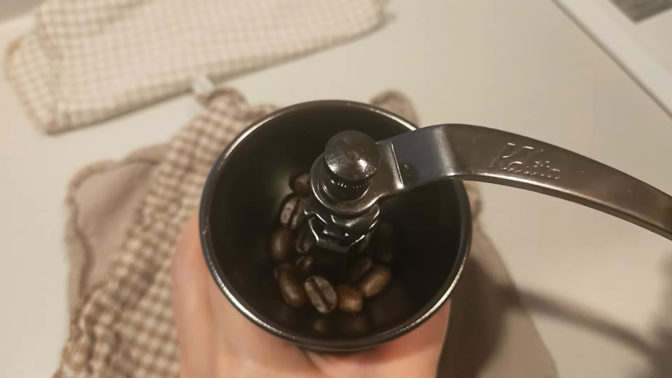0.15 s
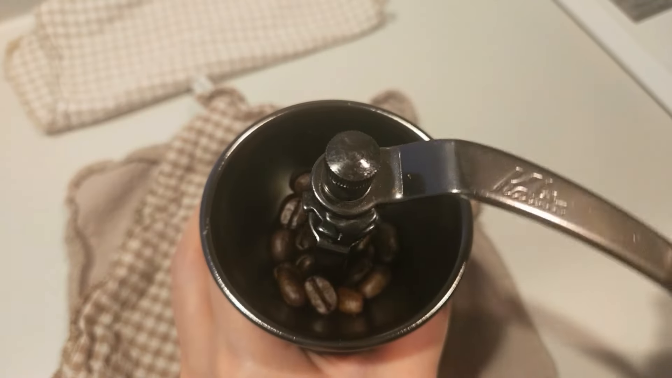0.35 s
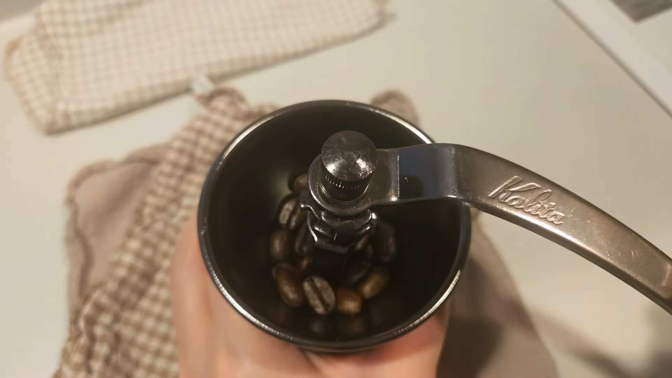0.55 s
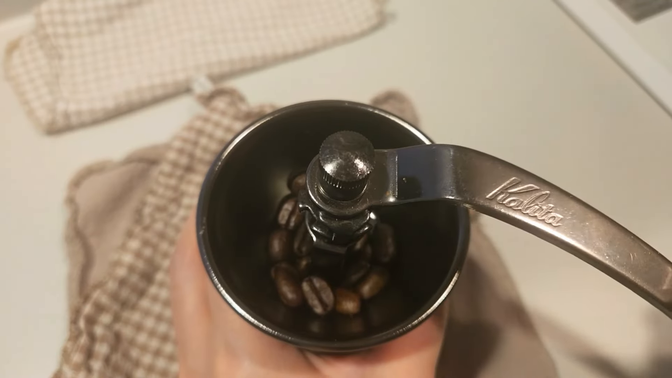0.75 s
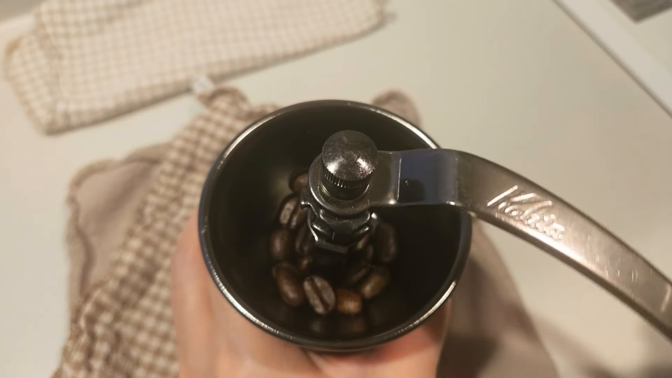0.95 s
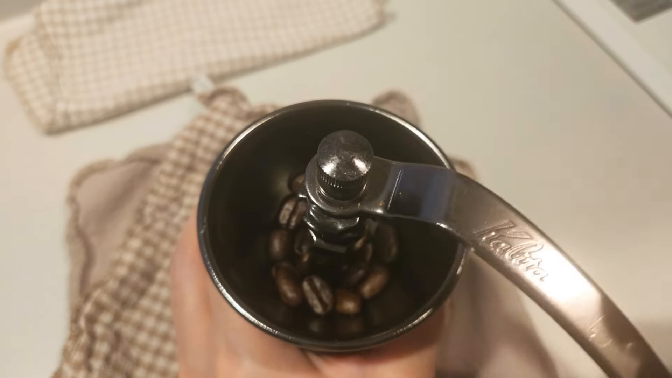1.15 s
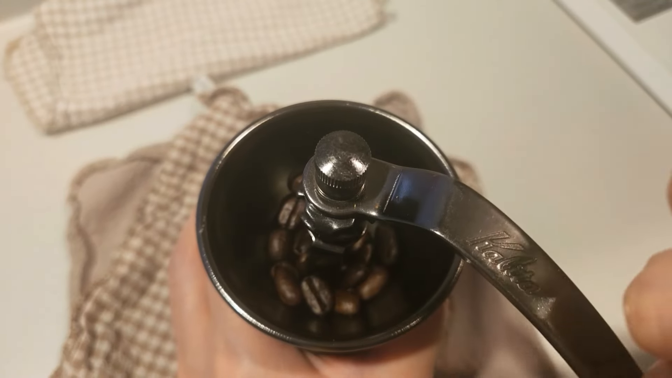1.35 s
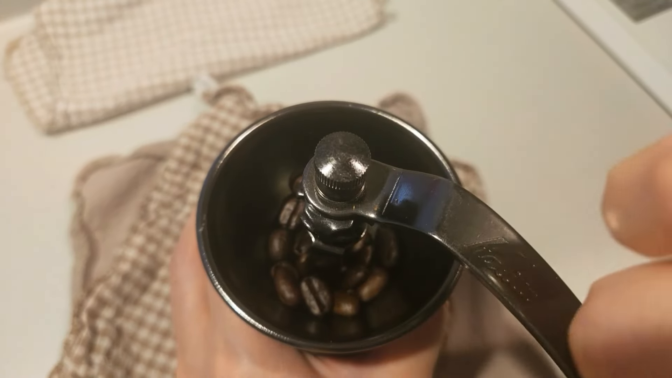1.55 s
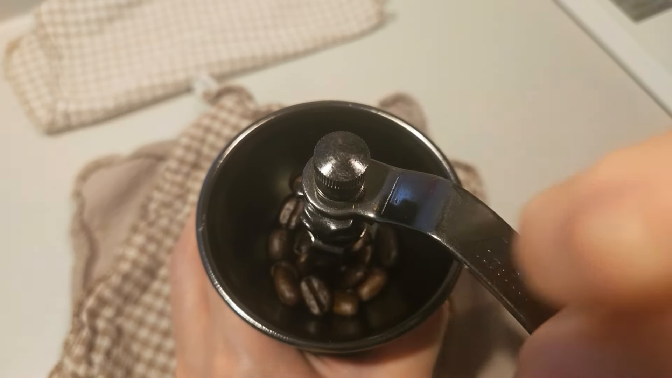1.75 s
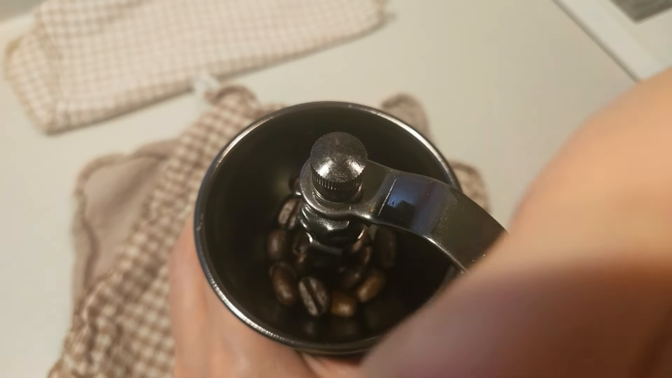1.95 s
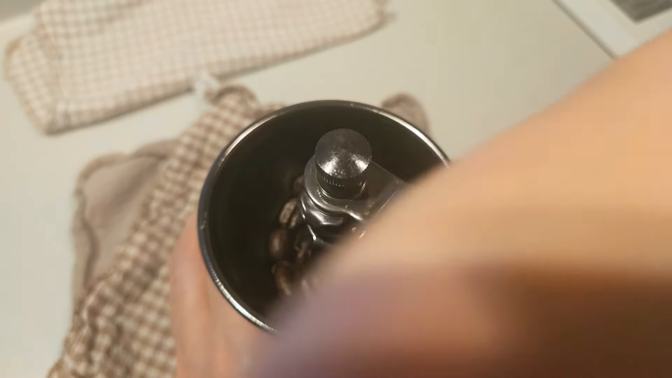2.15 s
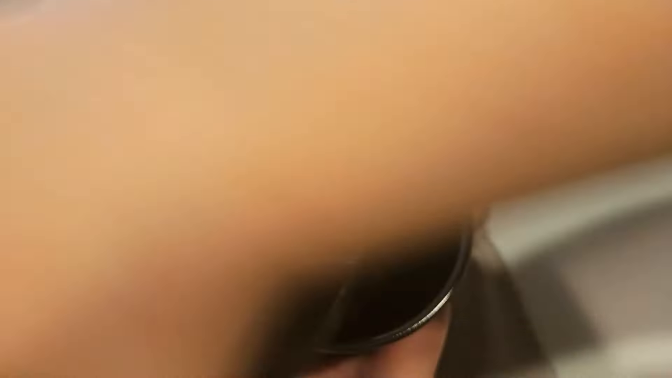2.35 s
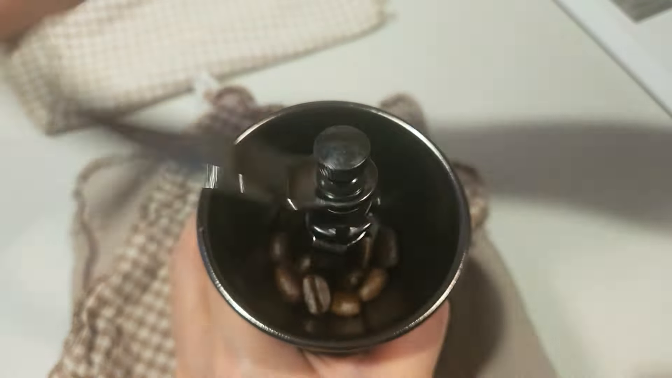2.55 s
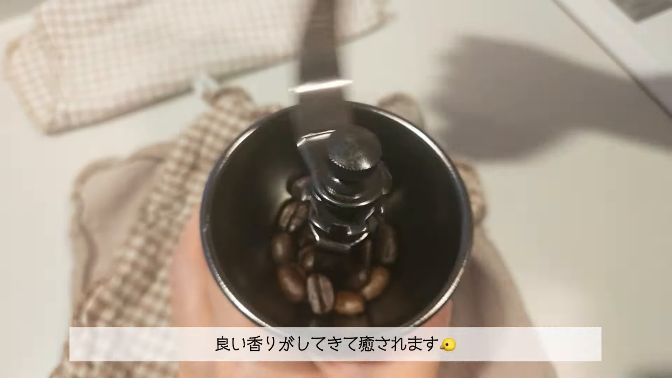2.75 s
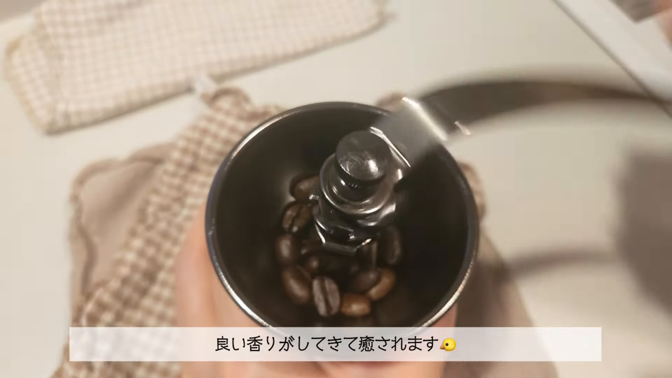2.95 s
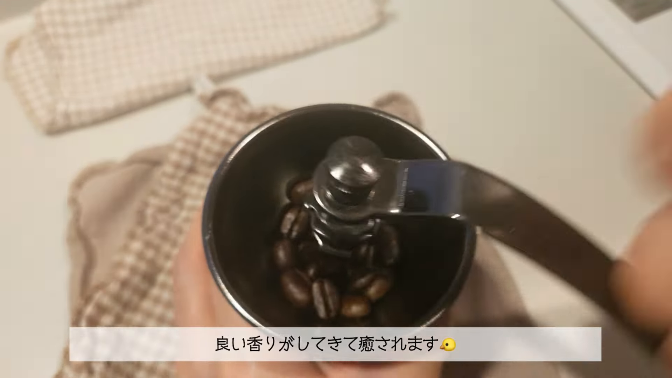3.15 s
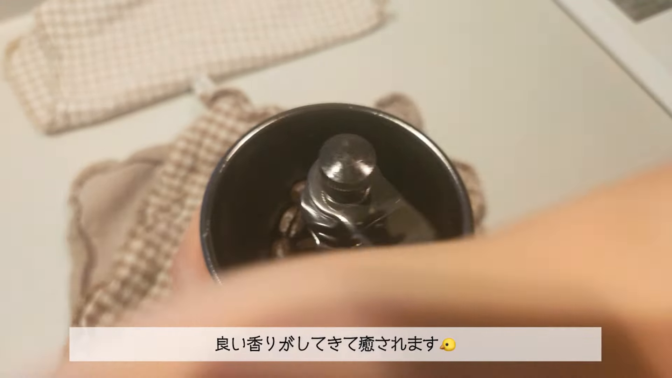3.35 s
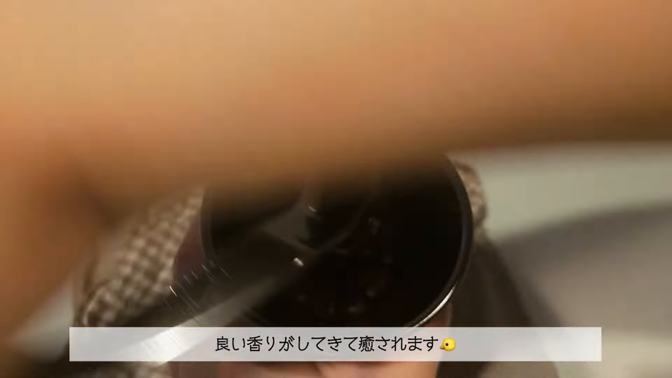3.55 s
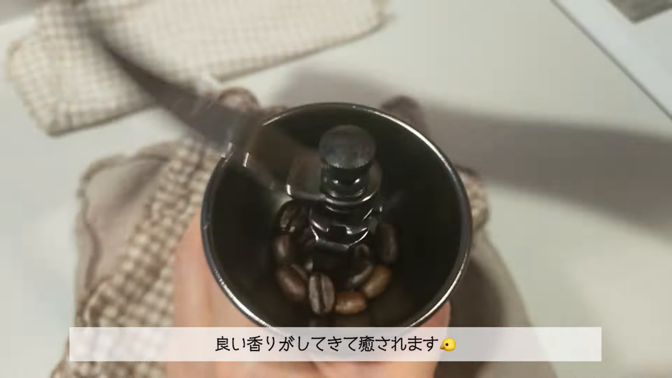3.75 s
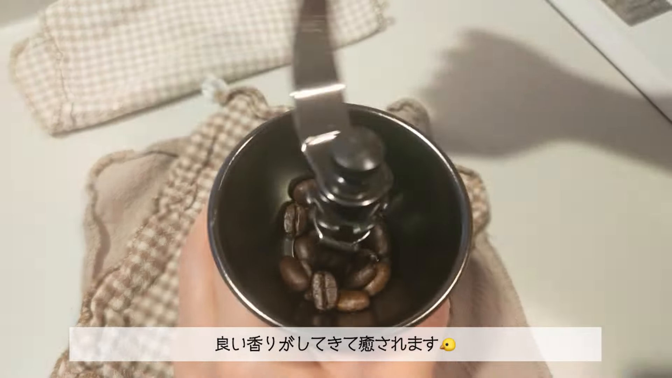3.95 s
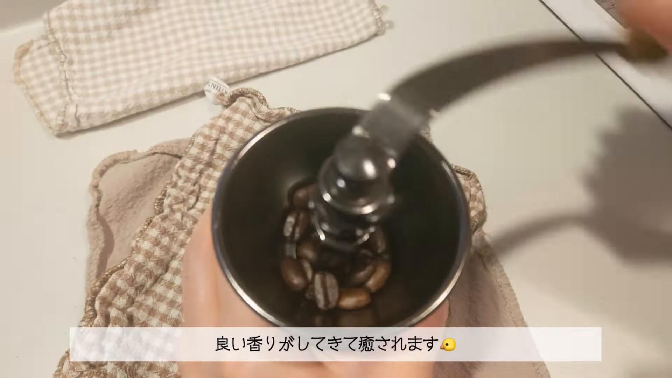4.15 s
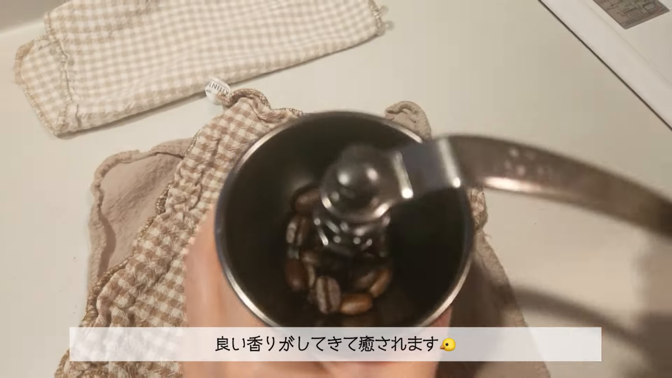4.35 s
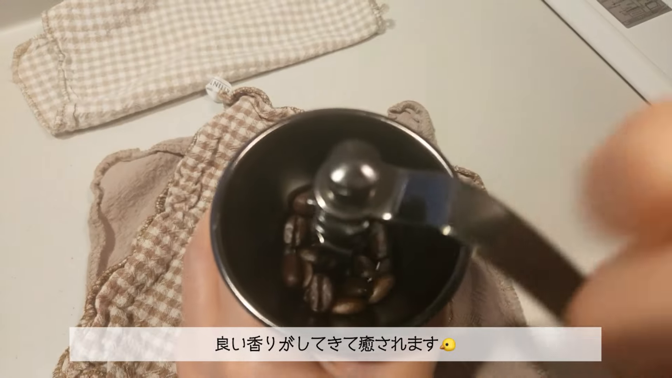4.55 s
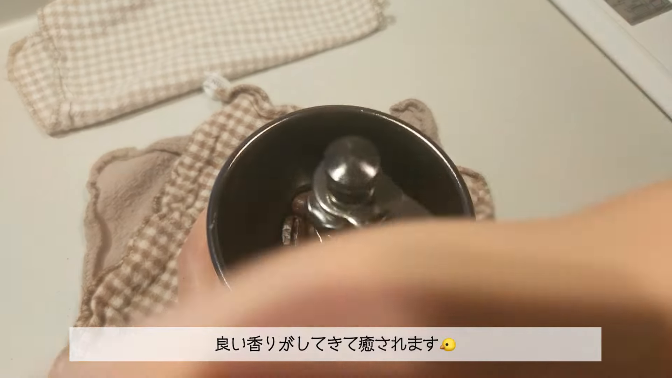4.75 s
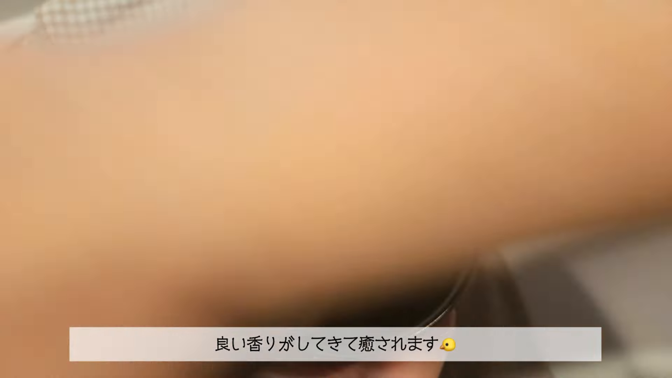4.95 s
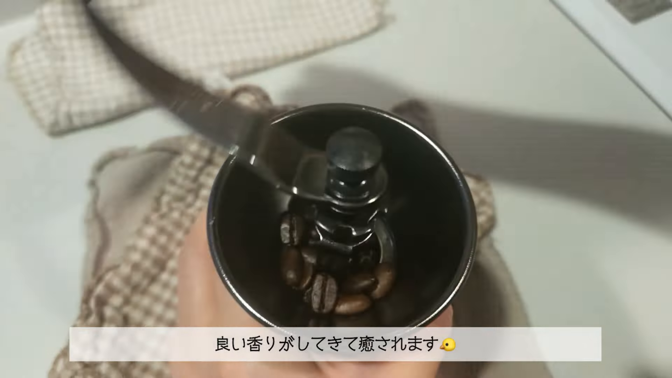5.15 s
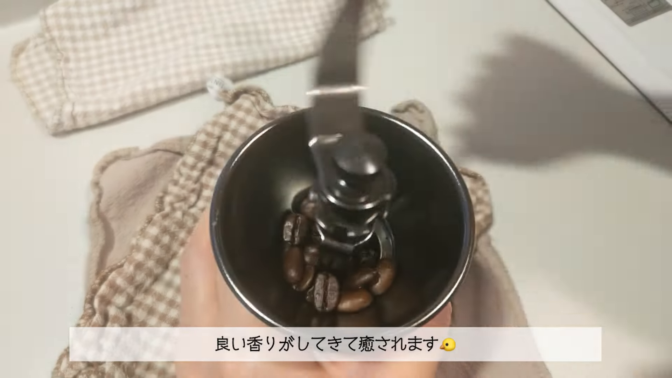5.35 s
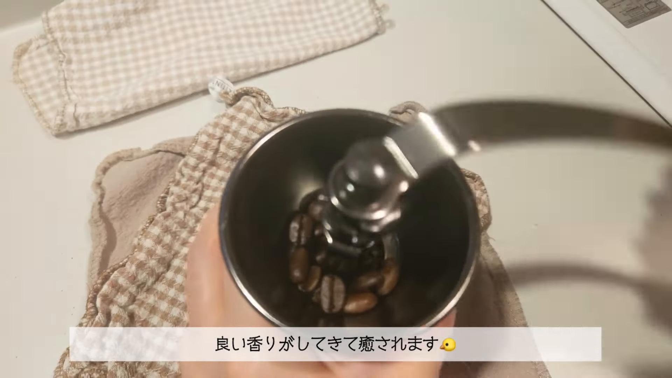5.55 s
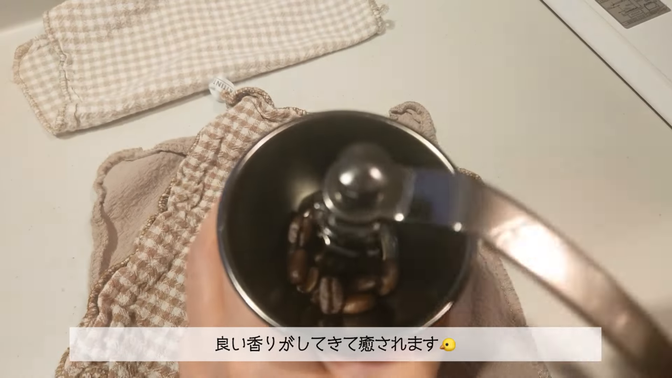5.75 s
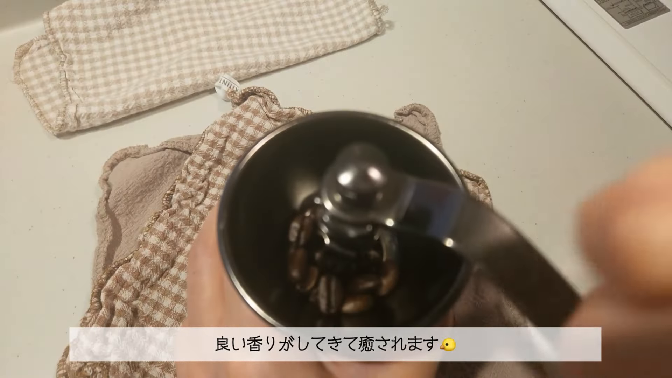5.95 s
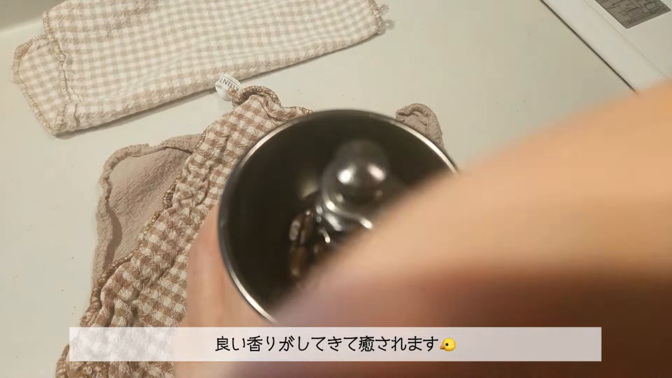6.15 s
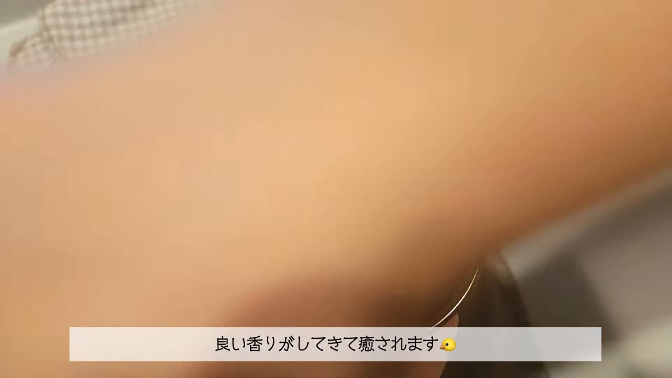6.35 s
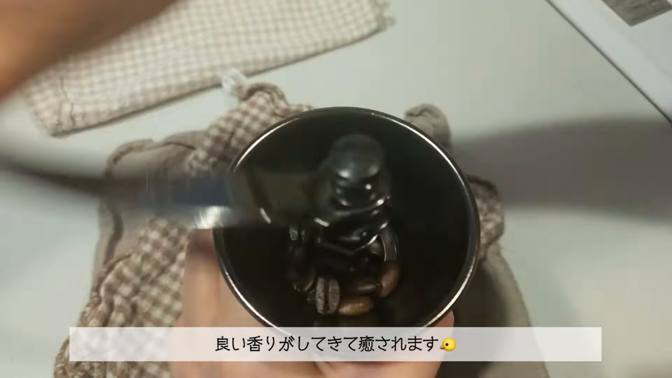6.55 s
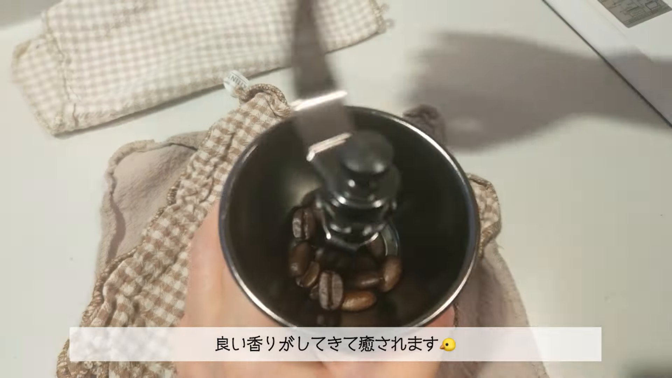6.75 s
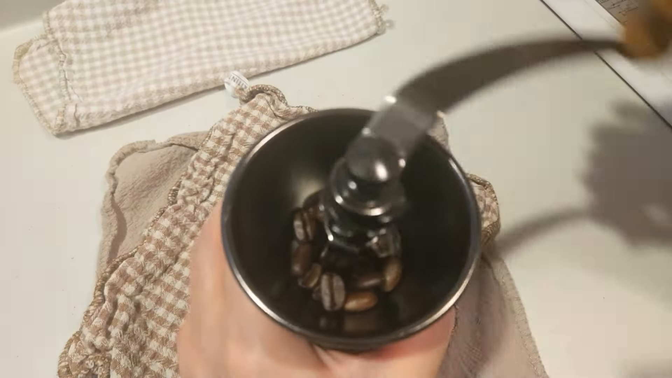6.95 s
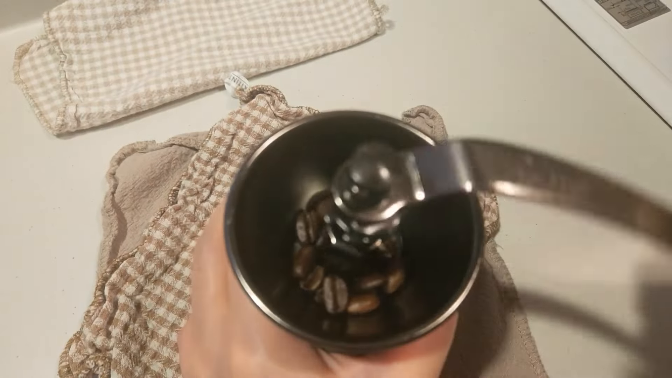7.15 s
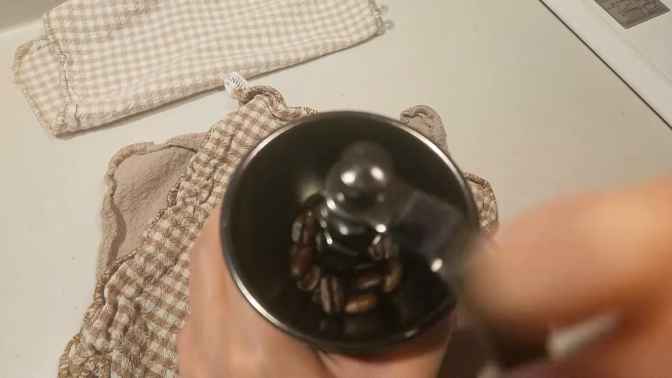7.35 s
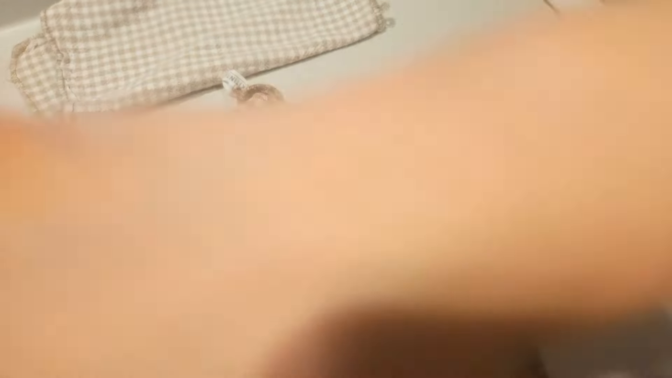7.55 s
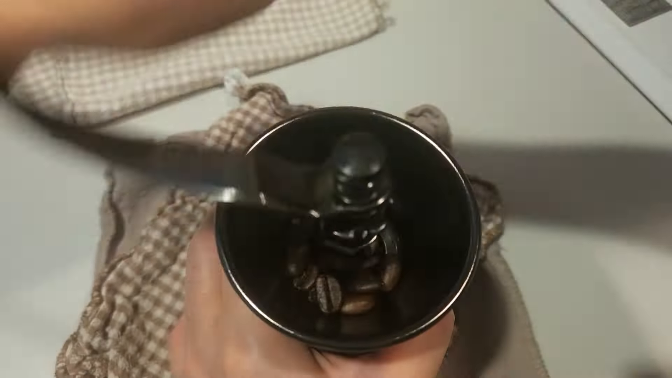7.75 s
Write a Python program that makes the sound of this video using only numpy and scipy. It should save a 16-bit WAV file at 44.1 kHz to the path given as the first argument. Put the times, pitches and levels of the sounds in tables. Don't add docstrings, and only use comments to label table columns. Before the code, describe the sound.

Close from above in a small kitchen, a hand coffee mill jerks through a few crunchy nudges, then rests with tiny metallic clicks over a faint low hum. After about two seconds a heavy knock starts continuous grinding: bright steel grit, irregular loud bean cracks, wooden body thumps and a rumbling drawer. One tiny bearing squeak follows a momentary stall near six seconds, and grinding continues to the end.

```python
import sys
import numpy as np
from scipy import signal
from scipy.fft import rfft, irfft, next_fast_len
from scipy.io import wavfile
from scipy.ndimage import uniform_filter1d, map_coordinates

SR = 44100
rng = np.random.default_rng(int(sys.argv[2]) if len(sys.argv) > 2 else 0)


def waveform_to_disk(signal):
    frames = np.transpose(np.atleast_2d(signal))
    scaled = np.clip(frames, -1, 1) * 32767
    samples = np.round(scaled).astype(np.int16)
    wavfile.write(sys.argv[1], SR, samples)


def voltage_ratio(decibels):
    exponent = np.asarray(decibels, float) / 20
    return 10 ** exponent


N = 344421
SNAP_LEN = 1500

# (frequency [Hz], width [Hz], level [dB])
WOOD_MODES = [(200.2, 40, -10), (253.5, 55.4, -7), (361.6, 19.2, -6), (412, 36, -6.5), (566, 94.4, -8),
              (804, 82, -16.5)]


def unit(x):
    return x / np.sqrt(np.mean(x ** 2) + 1e-20)


def along(points, hz):
    f, v = np.transpose(points)
    return np.interp(np.log(hz + 1), np.log(f + 1), v)


def wobble(rate):
    knots = rng.standard_normal(int(N * rate / SR) + 4)
    return map_coordinates(knots, [np.arange(N) * rate / SR])


def filtered(x, response):
    m = next_fast_len(N + SR // 2)
    return irfft(rfft(x, m) * response(np.fft.rfftfreq(m, 1 / SR)), m)[:N]


def lay(track, s, sound):
    track[round(s * SR):][:len(sound)] += sound


def modes(table):
    def response(f):
        total = 0
        for k, (center, width, db) in enumerate(table):
            damping = 1j * f * width
            total = total + (-1) ** k * voltage_ratio(db) * damping / (center * center - f * f + damping)
        return total
    return response


def small(f, hz):
    return (1j * f / hz / (1 + 1j * f / hz)) ** 3


def steel(f):
    # (frequency [Hz], width [Hz], level [dB])
    metal = [(1507, 700, -5), (2167, 60, 5), (2272, 82, 3), (2420, 120, 3), (2893, 123, -3.5),
             (3030, 64, 2.5), (3266, 186, 1.5), (3440, 143, 7.5), (3660, 400, 1.5), (4430, 215, 2),
             (5630, 1450, -3.5), (7940, 110, 1.5), (9450, 700, -12.5), (11100, 150, -3.5)]
    # (frequency [Hz], level [dB])
    dust = [(500, -15.5), (1000, -3.5), (3000, -26), (8000, -10), (11500, -12), (16000, -33)]
    return modes(metal)(f) + voltage_ratio(along(dust, f)) * (f > 300)


def fractures(count, spread_db, burst):
    when, chance = rng.random((count, 2)).T
    sizes = voltage_ratio(-2 * spread_db * np.log(chance + 0.037))
    power = np.bincount((when * N).astype(int), sizes, N)
    power = signal.lfilter([1], [1, -np.exp(-1 / (burst * SR))], power)
    return unit(np.sqrt(power) * rng.standard_normal(N))


def patchy(x, patchy_db, drift_db):
    z = signal.stft(x, nperseg=256)[2]
    crumbs = uniform_filter1d(rng.standard_normal(z.shape), size=9, axis=0)
    crumbs = uniform_filter1d(crumbs, size=7, axis=1)
    turns = uniform_filter1d(rng.standard_normal(z.shape), size=2, axis=0)
    turns = uniform_filter1d(turns, size=24, axis=1)
    colour = voltage_ratio(patchy_db * unit(crumbs) + drift_db * unit(turns))
    return signal.istft(z * colour, nperseg=256)[1][:N]


def held(x, grip):
    swing = np.sqrt(np.abs(uniform_filter1d(unit(x) ** 2, size=2000)) + 0.01)
    return unit(x / swing ** grip)


def bumps(rows, rise):
    s, db, half = np.transpose(rows)[:, :, None]
    t = np.arange(0, N, 64) / SR
    level = db - 11 * np.maximum((t - s) / half, (s - t) / (rise * half))
    return np.interp(np.arange(N) / SR, t, level.max(axis=0))


def droning(hz, wander):
    drift = wander * wobble(hz / 8) + 1.67 * wobble(hz / 40)
    return np.sqrt(2) * np.sin(2 * np.pi * hz * np.arange(N) / SR + drift)


def crank():
    # (start [s], length [s], grit level [dB], change over the length [dB], body over grit [dB])
    nudges = [(0.0, 0.0057, -34.5, -10, 7.5), (0.075, 0.07, -30.5, -6.5, 0),
              (0.16, 0.0066, -30.5, -5.5, 4.5), (0.329, 0.023, -60, -2.5, 5),
              (0.365, 0.076, -48.5, 11, 4.5), (0.435, 0.063, -36.5, -4, -7), (1.014, 0.14, -40.5, -4, 1),
              (1.121, 0.03, -36.5, -0.5, 6), (1.185, 0.13, -40, -13, 3.5),
              (1.363, 0.0038, -31.5, -14, -2.5), (1.454, 0.061, -57.5, -4.5, 3),
              (1.94, 0.02, -42.5, -4, 5.5)]
    # (time [s], speed as grit level [dB], downward load as body level [dB])
    effort = [(2.149, -34, -29.5), (2.54, -31, -24), (2.76, -33, -28), (3.23, -35.5, -28.5),
              (3.66, -30.5, -24.5), (4.05, -33.5, -28), (4.3, -34.5, -30.5), (4.83, -35, -28.5),
              (5.24, -28.5, -23.5), (5.46, -35.5, -28.5), (5.8, -34, -28.5), (6.025, -62.5, -58),
              (6.048, -42.5, -37.5), (6.4, -37, -29.5), (6.63, -28, -21.5), (6.75, -34.5, -29),
              (7.2, -35.5, -28.5), (7.81, -33.5, -25)]
    # (time [s], change [dB], half length [s])
    catches = [(2.205, -8, 0.053), (2.837, -0.5, 0.044), (3.849, 2.5, 0.035), (3.908, -6.5, 0.046),
               (3.938, 6, 0.023), (4.223, 4, 0.13), (4.428, -7, 0.0435), (4.517, 4, 0.048),
               (4.681, -5.5, 0.035), (5.573, 3.5, 0.13), (5.809, -6, .016), (5.851, 4.5, .025),
               (6.176, 8.5, 0.019), (6.253, 5.5, 0.017), (6.299, -19.5, 0.029), (6.323, 4.5, 0.068),
               (7.187, -9, 0.025), (7.452, -8.5, 0.025)]
    rise_db_per_s, fall_db_per_s = 3995, 457
    t = np.arange(0, N, 16) / SR
    s, length, db, change_db, over_db = np.transpose(nudges)[:, :, None]
    nudge_db = db + change_db * np.clip((t - s) / length, 0, 1)
    nudge_db -= rise_db_per_s * np.maximum(s - t, 0)
    nudge_db -= fall_db_per_s * np.maximum(t - s - length, 0)
    s, catch_db, half = np.transpose(catches)[:, :, None]
    catch_db = (catch_db * np.maximum(1 - np.abs(t - s) / half, 0)).sum(axis=0)
    s, speed_db, load_db = np.transpose(effort)
    turn_grit_db = np.interp(t, s, speed_db, -120) + catch_db
    turn_body_db = np.interp(t, s, load_db, -120) + 0.99 * catch_db
    grit_db = np.maximum(turn_grit_db, nudge_db.max(axis=0))
    body_db = np.maximum(turn_body_db, (nudge_db + over_db).max(axis=0))
    return [np.interp(np.arange(N) / SR, t, db) for db in (grit_db, body_db)]


def steel_burr(grit_db, load):
    coarse = fractures(count=2200, spread_db=1.5, burst=0.0029) + 0.54 * rng.standard_normal(N)
    fine = fractures(count=3000, spread_db=4.0, burst=0.00076) + 0.38 * rng.standard_normal(N)
    chips = fractures(count=500, spread_db=4.5, burst=0.0004)
    fine_db = -1.5 + 0.93 * np.clip(grit_db + 32, -12, 9)
    slow_db = np.clip(0.94 * (-32.5 - grit_db), 0, 3)
    grit = filtered(coarse, lambda f: 1 / (1 + 1j * f / 5000) ** 2)
    grit += filtered(voltage_ratio(fine_db) * fine, lambda f: small(f, hz=2980))
    grit += filtered(voltage_ratio(slow_db - 9) * chips, lambda f: small(f, hz=2470))
    ringing = patchy(filtered(grit, steel), patchy_db=1.5, drift_db=2.5)
    return voltage_ratio(grit_db - 1.5 + 0.2 * load) * unit(ringing)


def wooden_body(body_db, load):
    shove = fractures(count=1200, spread_db=2.5, burst=0.0057)
    lower = held(filtered(shove, modes(WOOD_MODES[:4])), grip=0.59)
    upper = filtered(voltage_ratio(1.339 * body_db + 31.5 + 0.26 * load) * shove, modes(WOOD_MODES[4:]))
    return voltage_ratio(body_db - 8.0 + 1.2 * load) * lower + upper


def humming_box(body_db):
    # (time [s], peak rms level [dB], half length [s])
    thrums = [(0.084, -24, 0.034), (0.122, -27, 0.014), (0.186, -26, 0.0095), (0.377, -36, 0.04),
              (0.452, -31, 0.016), (1.041, -31, 0.016), (1.149, -32.5, 0.055), (2.159, -21.5, 0.027),
              (2.276, -27.5, 0.088), (2.42, -27, 0.094), (2.548, -37, 0.055), (2.613, -30.5, 0.057),
              (2.675, -31, 0.044), (2.773, -33, 0.048), (2.915, -31.5, 0.033), (3.043, -23, 0.086),
              (3.115, -26, 0.043), (3.208, -28.5, 0.069), (3.32, -29, 0.084), (3.39, -24.5, 0.041),
              (3.493, -35, 0.025), (3.584, -34, 0.025), (3.642, -23.5, 0.036), (3.773, -26, 0.048),
              (3.82, -33, 0.023), (3.942, -33, 0.032), (4.173, -34, 0.032), (4.219, -28, 0.019),
              (4.325, -31, 0.019), (4.377, -26, 0.02), (4.506, -20.5, 0.037), (4.629, -29, 0.031),
              (4.747, -25, 0.058), (4.866, -31, 0.021), (4.995, -27, 0.02), (5.07, -22.5, 0.05),
              (5.18, -26.5, 0.11), (5.322, -25.5, 0.061), (5.609, -33, 0.058), (5.651, -37, 0.015),
              (5.699, -27, 0.057), (5.764, -33, 0.032), (5.838, -22.5, 0.022), (6.182, -29.5, 0.088),
              (6.341, -34.5, 0.026), (6.461, -32, 0.028), (6.516, -25, 0.036), (6.56, -30.5, 0.023),
              (6.623, -23, 0.094), (6.748, -28.5, 0.025), (7.054, -29, 0.015), (7.138, -29, 0.054),
              (7.317, -33, 0.026), (7.44, -27.5, 0.049), (7.505, -27, 0.038), (7.559, -26.5, 0.053),
              (7.676, -34, 0.05), (7.757, -25, 0.021)]
    thrum_db = np.minimum(bumps(thrums, rise=0.68), body_db + 7.0)
    box_db = np.maximum(body_db - 12, thrum_db)
    return voltage_ratio(box_db - 1.0 + 1.3 * wobble(40)) * droning(252.2, wander=0.88)


def drawer(body_db):
    # (time [s], peak level [dB], half length [s])
    jolts = [(0.08, -31, 0.085), (0.44, -39, 0.037), (1.1, -40.5, 0.045), (1.45, -44, 0.048),
             (2.152, -13, 0.0093), (2.55, -33, 0.076), (2.85, -26, 0.032), (3.12, -25.5, 0.024),
             (3.93, -22.5, 0.052), (4.24, -27, 0.057), (4.6, -35, 0.23), (5.2, -25, 0.061),
             (5.51, -34.5, 0.23), (5.76, -30.5, 0.053), (6.64, -35, 0.67), (7.59, -28.5, 0.056)]
    # (frequency [Hz], width [Hz], level [dB])
    shuffle_modes = [(30, 20, -10.5), (75, 55, -4), (152, 59, -5)]
    jolt_db = np.minimum(bumps(jolts, rise=0.23), body_db + 7)
    drawer_db = np.maximum(body_db - 16.5, jolt_db)
    boom = voltage_ratio(drawer_db - 2.5 + 0.64 * wobble(22)) * droning(128.3, wander=0.75)
    shuffle = held(filtered(rng.standard_normal(N), modes(shuffle_modes)), grip=0.55)
    return boom + voltage_ratio(0.43 * drawer_db + 0.5 * body_db - 9.5) * shuffle


def counter(body_db):
    # (time [s], peak level [dB], half length [s])
    heaves = [(0.182, -49.0, 0.092), (0.489, -45.5, 0.087), (1.189, -53, 0.17), (1.807, -63, 0.063),
              (2.241, -33, 0.064), (2.611, -32.5, 0.17), (2.728, -34, 0.058), (2.874, -31, 0.1),
              (3.077, -35, 0.15), (3.321, -46, 0.149), (3.775, -34.5, 0.18), (4.086, -29, 0.16),
              (4.308, -46.5, 0.07), (4.43, -46, 0.15), (5.352, -30.5, 0.14), (5.492, -34, 0.23),
              (6.232, -51, 0.088), (6.537, -41, 0.18), (6.821, -28, 0.17), (7.284, -45.5, 0.092),
              (7.625, -48, 0.15)]
    counter_db = np.maximum(body_db - 27.5, bumps(heaves, rise=0.77))
    return voltage_ratio(counter_db + 0.1 + 2.0 * wobble(9)) * droning(42.9, wander=0.68)


def grinding():
    grit_db, body_db = crank()
    load = wobble(30)
    rumble = wooden_body(body_db, load) + humming_box(body_db) + drawer(body_db) + counter(body_db)
    return steel_burr(grit_db, load), rumble


def hum():
    # (frequency [Hz], density [dB per Hz])
    murmur = [(20, -23), (45, -19.5), (80, -14.5), (150, -2.5), (200, -12.5), (270, -1.5), (340, -11),
              (420, -12.5), (520, -30), (900, -46.5), (3000, -49.5), (16000, -55.5)]
    noise = filtered(rng.standard_normal(N), lambda f: voltage_ratio(along(murmur, f)))
    return voltage_ratio(-51 - 1.5 + 0.5 * wobble(8.8)) * unit(noise)


def kitchen(x):
    # (frequency [Hz], time to fall 60 dB [s])
    decay = [(200, 0.4), (2000, 0.23), (10000, 0.21)]
    wet, step = np.zeros(N + SR), SR // 10
    for start in range(0, N, step):
        hz, t, z = signal.stft(rng.standard_normal(SR // 2), SR, nperseg=256)
        fade = voltage_ratio(-60 * t / along(decay, hz)[:, None])
        tail = signal.istft(z * fade, SR, nperseg=256)[1]
        answer = signal.fftconvolve(x[start:start + step], tail / np.linalg.norm(tail))
        wet[start + 150:][:len(answer)] += answer
    return wet[:N]


def beans():
    # (time [s], peak [dB], knock on the body [dB], brittleness [dB], pitch [Hz])
    bites = [(0.0585, -49, -17, -23, 3600), (0.0735, -9.5, -2.5, -22, 3510), (0.0802, -9, 2, -16, 3440),
             (0.1748, -15, -13, -0.5, 4060), (0.3646, -15.5, -5.5, -28, 3720), (0.4065, -18, -4, -6, 3600),
             (0.4393, -9, -26, -9, 10800), (0.478, -21, -5.5, -0.5, 3870), (1.0124, -16, -4.5, -4, 3650),
             (1.0812, -17.5, -8, -5, 3700), (1.3588, -27.5, -20, -6, 5440), (1.4635, -31.5, -15, -7, 3170),
             (1.941, -21, -8, -6, 3510), (2.142, -35, -2, -16, 3470), (2.1515, -15, 12.5, -24, 2164)]
    # (time [s], peak [dB], brittleness [dB], pitch [Hz])
    shattered = [(2.5762, -6, -1.5, 14600), (2.892, -10.5, 1.5, 4430), (3.661, -9, -0.5, 4240),
                 (3.691, -12, 1, 3770), (4.367, -10.5, -1, 3230), (4.4424, -13.5, -2, 3500),
                 (4.5999, -7.5, 0, 10700), (4.631, -26, 9, 5700), (4.6521, -4.5, -8, 5360),
                 (4.689, -5, -1.5, 9800), (4.754, -15, -1.5, 3580), (5.196, -8.5, -2.5, 9700),
                 (5.4986, -4, -1, 5740), (5.6021, -8, -9, 3850), (5.6193, -3.5, -5, 4800),
                 (5.72, -3, -5, 5230), (6.4656, -11, -6, 4740), (6.483, -17.5, 8, 12000),
                 (6.5102, -4.5, 2, 4070), (6.61, -21, 5.5, 3150), (6.784, -11.5, 4.5, 3430),
                 (6.8458, -13.5, 2, 11100), (6.9156, -21, 6.5, 14600), (7.7061, -8.5, -4.5, 3090)]
    # (time [s], peak [dB], knock [dB], pitch [Hz])
    tough = [(2.2609, -17, 6, 3600), (2.3148, -19, 3, 2270), (2.4331, -16, 12.5, 3310),
             (2.6373, -22, 8, 3440), (2.74, -32, -6, 5800), (2.7692, -10, 1.5, 2450),
             (3.031, -4.5, 0.5, 3600), (3.1061, -11, 3.5, 3440), (3.298, -30, 9, 5700),
             (3.3794, -10.5, 5.5, 3770), (3.6196, -13, -7, 5440), (4.0906, -11.5, 4.5, 2170),
             (4.2166, -3, -4.5, 3720), (4.3004, -21, 9, 3500), (4.479, -4, -25, 3710),
             (4.515, -25, 3, 3440), (5.027, -13.5, 3, 3440), (5.3309, -11, -14, 3120),
             (5.4208, -20.5, 9, 3550), (5.826, -9, 1.5, 3500), (6.078, -16.5, 2, 5630),
             (6.1468, -32.5, 14, 3700), (6.2364, -14.5, 4.5, 3250), (6.331, -13, -11, 2190),
             (6.5491, -12.5, 6, 3240), (6.73, -7, -8, 3700), (6.981, -7, -4, 3450),
             (7.0304, -13.5, 0.5, 2190), (7.4968, -26.5, 19, 3620), (7.553, -38, 26, 2270)]
    # (time [s], peak [dB], brittleness [dB], pitch [Hz])
    plain = [(2.5221, -8, -21, 3300), (2.5357, -3.5, -18, 3405), (2.9637, -14, -17, 3800),
             (3.215, -28, -16, 2170), (3.405, -11.5, -12, 2125), (3.472, -18.5, -10, 2230),
             (3.637, -7, -13, 3270), (3.834, -10, -23, 3500), (3.929, 2.5, -30, 5470),
             (3.947, -4, -23, 3140), (4.0722, -11.5, -6, 2470), (4.27, -22, -16, 3480),
             (4.349, -19, -29, 2480), (4.555, -18, -10, 3430), (4.916, -15, -29, 3450),
             (5.1625, -15, -18, 4400), (5.241, -6, -16, 3350), (5.277, -9.5, -22, 3180),
             (5.5446, -6.5, -9, 4570), (5.942, -28.5, -12, 2260), (6.0428, -24, -26, 2470),
             (6.411, -18, -6, 4460), (6.961, -20, -3, 11100), (7.1558, -13.5, -7, 4860),
             (7.212, -16.5, -9, 2300), (7.2826, -16.5, -27, 2290), (7.501, -17, -15, 3000),
             (7.647, -11.5, -11, 3340), (7.7638, -10.5, -5.5, 4540)]
    # (time [s], peak [dB], pitch [Hz])
    flying = [(0.0974, -26, 2290), (0.1464, -34, 3600), (0.4889, -27, 3530), (1.0253, -15, 3480),
              (1.07, -20, 3630), (1.1316, -37, 3700), (1.1478, -20.5, 3570), (1.1574, -32, 3590),
              (1.2085, -18, 3340), (2.2403, -19, 2180), (2.333, -11, 2210), (2.3508, -11, 3540),
              (2.4064, -14, 3450), (2.4627, -5, 3510), (2.598, -15, 4400), (2.6928, -20, 3520),
              (2.806, -19, 6200), (2.8798, -9, 4430), (2.9933, -12, 2420), (3.8391, -17, 3540),
              (3.8667, -7, 3430), (4.0224, -13, 3570), (4.147, -16, 3030), (4.3217, -14, 3550),
              (4.586, -23, 3600), (5.037, -6.5, 5670), (5.368, -12, 3630), (5.387, -24, 3560),
              (5.644, -10, 2170), (5.675, -10, 2420), (5.8794, -42, 2230), (6.3248, -28, 2210),
              (6.569, -6, 5700), (6.6455, -7.5, 6040), (6.715, -19, 3670), (6.8124, -13, 2170),
              (7.3632, -14, 3760), (7.421, -35, 3800), (7.748, -13, 3370)]
    # (time [s], peak [dB], brittleness [dB], pitch [Hz])
    shells = [(0.0987, -24, -4, 3560), (0.127, -37, -8, 4470), (0.358, -41, -7, 6950),
              (0.435, -24, -3, 5010), (0.491, -26, -12, 3520), (3.706, -9.5, -6, 5560),
              (3.384, -9, -25, 3840), (4.41, -17, -9, 6000), (6.896, -26, -2, 8800), (7.122, -26, -4, 9000),
              (2.797, -29, -2, 6000)]
    snap_knock_db = -15.5
    snaps = [(s, db, snap_knock_db - db, brittle_db, hz) for s, db, brittle_db, hz in shattered]
    thuds = [(s, db, knock_db, -17, hz) for s, db, knock_db, hz in tough]
    splits = [(s, db, -8, brittle_db, hz) for s, db, brittle_db, hz in plain]
    chips = [(s, db - 2.5, -7, -17.5, hz) for s, db, hz in flying]
    splinters = [(s, db, snap_knock_db - db - 18, brittle_db, hz) for s, db, brittle_db, hz in shells]
    return bites + snaps + thuds + splits + chips + splinters


def snap(hz, t60, ring_db, ring_s):
    t = np.arange(SNAP_LEN) / SR
    burst = voltage_ratio(-60 * t / t60) * rng.standard_normal(SNAP_LEN)
    burst[:3] += voltage_ratio(10) * np.array([1, 1, -1])
    drift = np.cumsum(0.22 * rng.standard_normal(SNAP_LEN))
    decay = voltage_ratio(ring_db - 60 * t * np.sqrt(hz / 3500) / ring_s)
    shard = decay * np.sin(2 * np.pi * hz * t + drift) * (1 - np.exp(-t / 0.00025))
    return burst, shard


def cracks():
    bursts, spits, shards, knocks = np.zeros((4, N + SNAP_LEN))
    samples = np.arange(SNAP_LEN)
    for s, db, knock_db, brittle_db, hz in beans():
        t60 = 0.019 * voltage_ratio(-0.3 * (db + 10.5))
        burst, shard = snap(hz, t60, ring_db=-13.0, ring_s=0.032)
        push = 0.25 * rng.standard_normal(SNAP_LEN) + 1.06 * (samples < 12)
        push *= voltage_ratio(-60 * samples / SR / 0.045)
        lay(bursts, s, voltage_ratio(db - 5.5) * burst)
        lay(spits, s, voltage_ratio(db + brittle_db) * burst)
        lay(shards, s, voltage_ratio(db) * shard)
        lay(knocks, s, voltage_ratio(db + knock_db + 17.5) * push)
    ringing = filtered(bursts[:N], lambda f: steel(f) * small(f, hz=990) / (1 + 1j * f / 8000))
    treble = filtered(spits[:N], lambda f: small(f, hz=5230) / (1 + 1j * f / 14000) ** 2)
    thumps = filtered(knocks[:N], lambda f: modes(WOOD_MODES[:5])(f) / (1 + 1j * f / 400))
    return ringing + treble + shards[:N], thumps


def ticks():
    # (time [s], peak [dB], pitch [Hz])
    taps = [(0.3384, -42.5, 3550), (0.776, -60, 2420), (0.932, -61, 1760), (0.956, -56, 1800),
            (0.993, -46, 3630), (1.048, -32, 3660), (1.112, -30, 3550), (1.184, -38, 3340),
            (1.215, -32.5, 2304), (1.2607, -41.5, 1460), (1.2835, -39.5, 1316), (1.316, -39, 2500),
                     (2.135, -48, 1600), (4.6, -22, 1455), (4.686, -21, 1502), (3.564, -18, 613)]
    bursts, shards = np.zeros((2, N + SNAP_LEN))
    for s, db, hz in taps:
        burst, shard = snap(hz, t60=0.07, ring_db=-6, ring_s=0.06)
        lay(bursts, s, voltage_ratio(db - 5.0) * burst)
        lay(shards, s, voltage_ratio(db) * shard)
    return filtered(bursts[:N], lambda f: steel(f) / (1 + 1j * f / 9000)) + shards[:N]


def play():
    # (time [s], peak [dB])
    shifts = [
        (0.7333, -65),
        (1.577, -57),
        (1.6094, -69),
        (1.6268, -51.5),
        (1.7505, -65),
        (1.784, -46.5),
        (1.9062, -52),
    ]
    # (frequency [Hz], width [Hz], level [dB])
    arm = [(1450, 130, 2), (1830, 92, -3), (2650, 200, -16), (3700, 400, -8), (4640, 300, -20),
           (6200, 600, -10), (7850, 100, -24)]
    scrapes, t = np.zeros(N + 4000), np.arange(4000) / SR
    decay = voltage_ratio(-60 * t / 0.018) + 0.19 * voltage_ratio(-60 * t / 0.37)
    for s, db in shifts:
        lay(scrapes, s, voltage_ratio(db + 13.5) * decay * rng.standard_normal(4000))
    return filtered(scrapes[:N], lambda f: modes(arm)(f) + voltage_ratio(-14) * small(f, hz=1000) / (1 + 1j * f / 6000))


def pings():
    # (time [s], peak [dB], pitch [Hz], time to fall 60 dB [s])
    strikes = [(2.5365, -19, 3300, 0.034), (2.8917, -17.5, 4430, 0.033), (2.892, -20, 5900, 0.027),
               (4.492, -19.5, 7500, 0.027), (6.8435, -18, 11600, .01), (6.8446, -9, 11150, 0.018),
               (6.851, -26, 11800, 0.055), (6.862, -31, 11300, 0.045), (6.237, -21, 3300, .02),
               (5.8255, -22, 7830, .02), (6.1755, -18.5, 3520, .025), (6.1817, -14.5, 3720, 0.023)]
    out, t = np.zeros(N + 4000), np.arange(4000) / SR
    for s, db, hz, t60 in strikes:
        drift = np.cumsum(0.08 * np.sqrt(hz / 5000) * rng.standard_normal(4000))
        tone = np.sin(2 * np.pi * hz * t + drift) * (1 - np.exp(-t / 0.00035))
        lay(out, s, voltage_ratio(db - 60 * t / t60) * tone)
    return out[:N]


def squeak():
    # (time [s], level [dB])
    pressure = [
        (6.1, -52),
        (6.109, -43),
        (6.124, -52),
        (6.133, -38),
        (6.151, -29),
        (6.162, -41),
        (6.171, -21),
        (6.179, -34),
        (6.208, -37),
    ]
    # (multiple of the pitch, level [dB])
    tones = [(2, -3), (3, -12), (4, -17)]
    start_s, seize_s = 6.1, 6.172
    start_hz, climb_hz_per_s, slack_hz = 3545, 3700, 50
    t = np.arange(N) / SR
    after = np.maximum(t - seize_s, 0)
    hz = start_hz + climb_hz_per_s * (np.clip(t, start_s, seize_s) - start_s) - slack_hz * (after > 0)
    rough = np.where(after > 0, 0.012, 0.004)
    phase = 2 * np.pi * np.cumsum(hz * (1 + rough * wobble(340))) / SR
    level_db = np.interp(t, *np.transpose(pressure), -120, -120) + 1.5 * wobble(300)
    overtones = sum(voltage_ratio(tone_db) * np.sin(k * phase) for k, tone_db in tones)
    harsh_db = np.clip(0.6 * (level_db + 30), -20, 0) - 7 - 2000 * after
    return voltage_ratio(level_db) * (np.sin(phase) + voltage_ratio(harsh_db) * overtones)


def scene():
    burr, rumble = grinding()
    splits, knocks = cracks()
    loose = ticks() + play()
    bright = burr + splits + pings()
    low = rumble + knocks
    room = kitchen(voltage_ratio(-8.0) * bright + voltage_ratio(-8.5) * low + voltage_ratio(-6.0) * loose)
    return (bright + low + loose + room + squeak() + hum())[None]


def top_cut(x):
    return signal.sosfilt(signal.butter(12, 16820, fs=SR, output="sos"), x)


def record(dry):
    # (frequency [Hz], level [dB])
    band = [(20, -42.5), (38, 0), (15850, -0.5), (16050, -35), (16800, -37), (16900, -120)]
    mix = filtered(dry[0], lambda f: voltage_ratio(along(band, f)))[None]
    return top_cut(mix)


dry = scene()
out = record(dry)
waveform_to_disk(out)
```